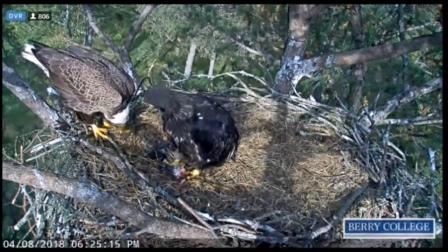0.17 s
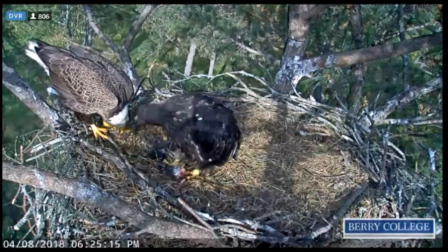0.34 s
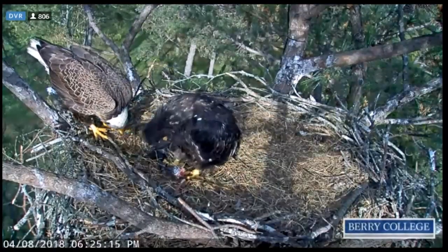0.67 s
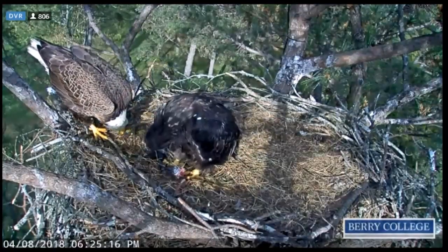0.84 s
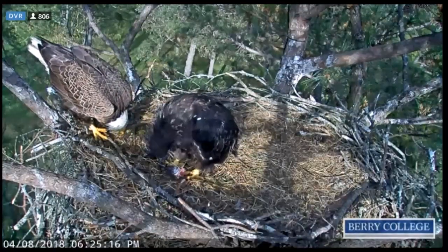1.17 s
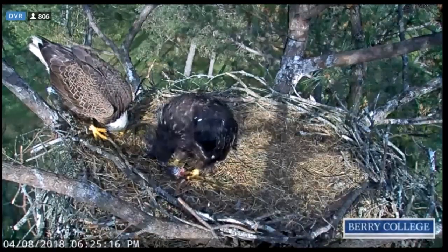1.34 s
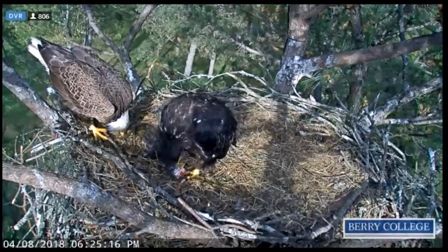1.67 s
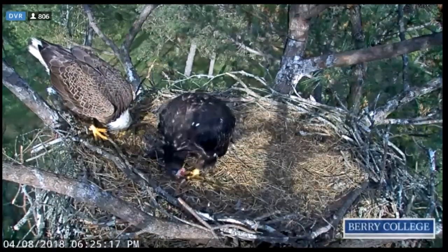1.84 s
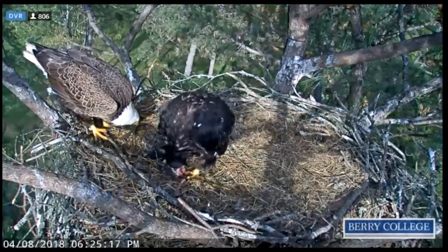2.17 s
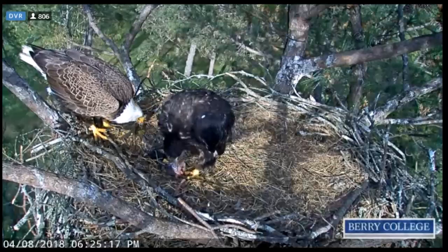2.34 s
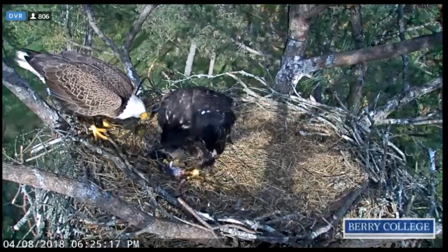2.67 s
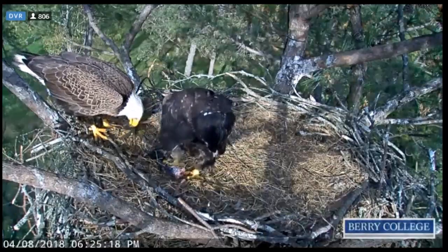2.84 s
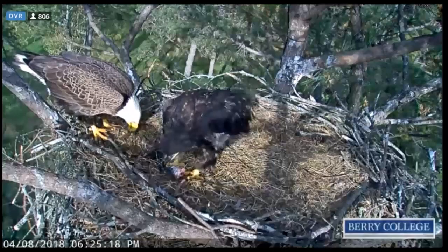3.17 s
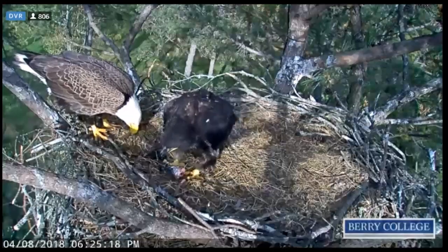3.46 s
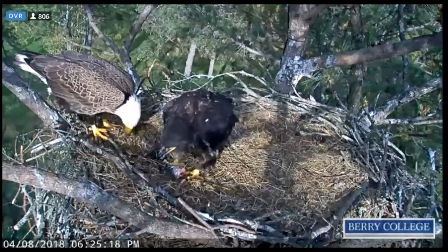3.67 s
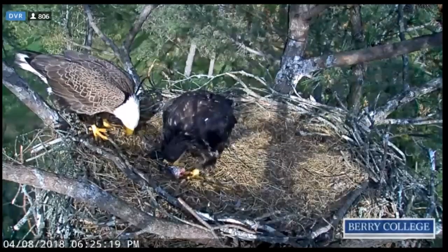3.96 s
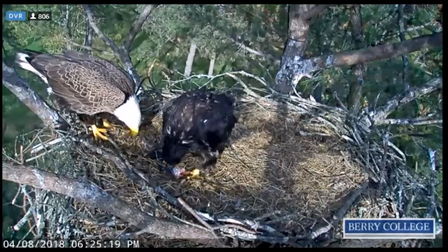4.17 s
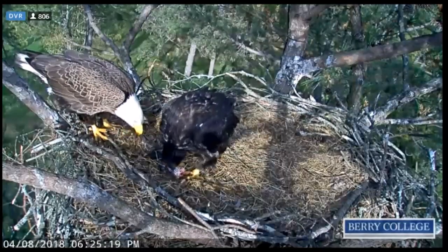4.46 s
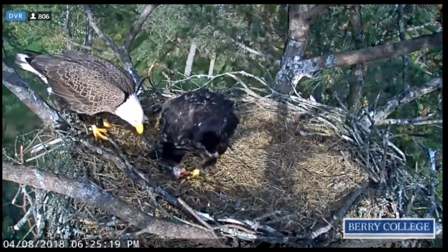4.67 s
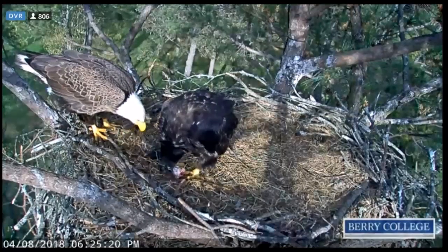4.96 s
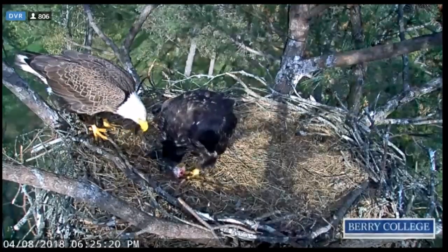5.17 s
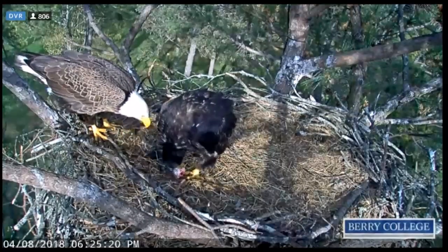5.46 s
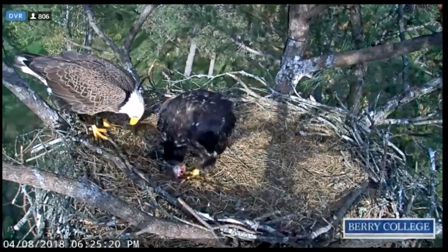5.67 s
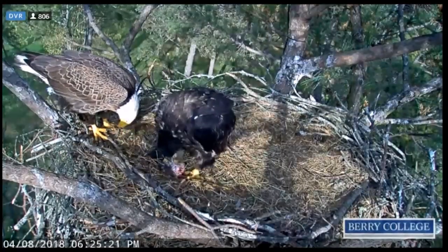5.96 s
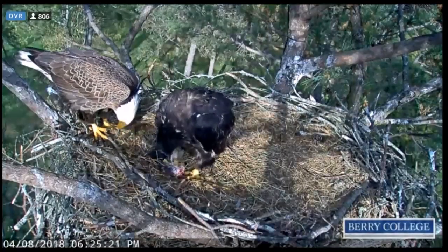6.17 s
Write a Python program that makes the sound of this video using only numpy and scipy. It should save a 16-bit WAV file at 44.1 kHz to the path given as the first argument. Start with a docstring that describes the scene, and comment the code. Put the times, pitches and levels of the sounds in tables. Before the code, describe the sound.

A treetop eagle nest outdoors, heard through a modest microphone with a coarse, faintly mirrored treble. Distant traffic makes a steady low rumble and soft tyre wash, with a weak wavering hum beneath. Wind thumps deeply on the microphone from 0 to about 2 seconds, then mostly calms. At 0.6 seconds a young eagle begins a thin, faint two-toned whistle, climbing unsteadily from about 2.8 to 4.2 kilohertz; it grows loud and raspy around 2.0 to 2.4, cracks, and drops off at 2.5. A twig snaps sharply at 2.9, and a far songbird slurs upward at 3.0. Tiny twig ticks follow. From 4.3 to 5.3 a second, quieter call quavers, buzzes hoarsely around 3.3 kilohertz, breaks upward near 5.0 and falls away. Faint songbird notes come at 5.5 and 5.7, light wind bumps return, and dry twigs crack at 6.07 and 6.27.

```python
'''At a treetop nest a young eagle begs twice: thin whistles from the two sides of its syrinx, hoarse near the top.
Each side is a tone with an octave, roughened by flutter; noise rung by throat resonances adds the rasp.
Twigs snap under the birds as short ringing noise, and a far songbird slurs a few sine whistles.
Shaped noise makes the wind on the microphone and the distant traffic; wavering sines make a low hum.
The nest camera samples at a low rate, so every whistle has a faint mirror image in the treble.'''
import sys
import numpy as np
from scipy import signal
from scipy.fft import rfft, irfft
from scipy.io import wavfile
from scipy.ndimage import uniform_filter1d

SR = 44100
rng = np.random.default_rng(int(sys.argv[2]) if len(sys.argv) > 2 else 0)


def transcribe(u):
    """Save the signal u as a 16-bit wav file named by the first command-line argument.

    u: samples, shape (n,) or (channels, n), limited to [-1, 1]; the rate is SR.
    q: integer samples, one column per channel.
    """
    v = np.clip(np.atleast_2d(u).T, -1, 1)
    q = np.round(v * 32767).astype(np.int16)
    wavfile.write(sys.argv[1], SR, q)


N = 277872
TIME = np.arange(N) / SR  # seconds
ATTACK_S, RELEASE_S = 0.0094, 0.015  # ramps of the eagle's whistles
# voice breaks, where the pitch jumps for a moment:
# (time [s], length [s], jump [Hz], level change [dB], octave level change [dB], spurt of rasp [dB])
BREAKS = [(1.331, .018, -110, 1, 0, -81), (2.314, .044, -370, -1, 20, -55), (4.912, .014, 270, 7, -10, -77),
          (5.075, .059, 380, -5, -6, -78)]


def undb(db):
    """Decibels to gain."""
    return 10 ** (np.asarray(db) / 20)


def unit(x):
    """Scale to rms 1."""
    return x / np.sqrt(np.mean(x ** 2))


def even(x, size):
    """Hold the rms near 1 over a sliding window of size samples."""
    return x / np.sqrt(uniform_filter1d(x ** 2, size))


def curves(table):
    """Each column after the time, joined by straight lines."""
    s, *columns = np.transpose(table)
    return [np.interp(TIME, s, column) for column in columns]


def gate(start, end, attack_s, release_s):
    """Attack, hold and release, the ramps centred on the start and the end."""
    opening = (TIME - start) / attack_s
    closing = (end - TIME) / release_s
    return np.clip(.5 + np.minimum(opening, closing), 0, 1)


def bump(s, half_s):
    """A smooth swell around one moment, down to 1/e at half_s either side."""
    return np.exp(-((TIME - s) / half_s) ** 2)


def wander(hz):
    """Random motion of rms 1, mostly slower than hz."""
    lowpass = signal.butter(4, hz, fs=SR, output="sos")
    settled = signal.sosfilt(lowpass, rng.standard_normal(N + SR))[SR:]  # skip the filter's start
    return unit(settled)


def coloured(points):
    """Noise of rms 1 with the given spectrum."""
    hz, db = np.transpose(points)
    f = np.arange(N // 2 + 1) * SR / N
    gain = undb(np.interp(np.log(f + 1e-9), np.log(hz), db))
    spectrum = rfft(rng.standard_normal(N)) * gain * (f > 0)
    return unit(irfft(spectrum, N))


def resonate(x, modes):
    """Parallel resonances, each applied twice for steep flanks."""
    out = 0
    for hz, width, db in modes:
        b, a = signal.iirpeak(hz, hz / width, fs=SR)
        once = signal.lfilter(b, a, x)
        out = out + undb(db) * signal.lfilter(b, a, once)
    return out


def phase_of(hz):
    """Running phase [rad] of a moving pitch."""
    return 2 * np.pi * np.cumsum(hz) / SR


def wind(wind_db=1.43, eddy_db=0.0, eddy_hz=9):
    """Eddies buffet the microphone: a changing breeze with short, stronger blows on top."""
    # breeze between the buffets, before wind_db: (time [s], level [dB])
    breeze_levels = [(0, -44), (.4, -43.5), (1.05, -48.5), (1.27, -49.5), (1.5, -42.5), (2.05, -55.5),
                     (3.6, -52.5), (3.85, -56), (5.2, -58), (5.9, -50), (6.3, -59)]
    # strongest buffets, before wind_db: (time [s], level [dB])
    buffets = [(.09, -38), (0.192, -37), (0.269, -37), (.4, -35), (0.579, -38), (.72, -47), (.84, -39),
               (.97, -48), (1.125, -34), (1.405, -34), (1.6, -43), (1.667, -32.5), (1.839, -38.5),
               (1.95, -46.5), (3.37, -44.5), (4.783, -40.5), (4.87, -44), (5.421, -42), (5.549, -42.5),
               (5.72, -44.5), (6.14, -45), (6.25, -44)]
    # spectrum at the microphone: (frequency [Hz], relative density [dB])
    wind_colour = [(8, -2), (22, -0.5), (45, -0.5), (65, -1), (90, -8), (130, -16.5), (200, -28.5),
                   (400, -78)]
    db, = curves(breeze_levels)
    breeze = undb(db + eddy_db * wander(eddy_hz))
    blows = sum(undb(level) * bump(s, half_s=0.024) for s, level in buffets)
    noise = unit(even(coloured(wind_colour), size=3400))
    return undb(wind_db) * np.hypot(breeze, blows) * noise


def distant_traffic(rumble_db=-56.5, road_db=1):
    """Far traffic: a low rumble and a soft band of tyre noise, both of shaped noise."""
    # tyre noise, before road_db: (time [s], level [dB])
    road_levels = [(0.1, -63.5), (2.44, -64.5), (3.09, -61.5), (5.89, -64.5), (6.2, -64.5)]
    # spectrum of the tyre noise: (frequency [Hz], relative density [dB])
    road_colour = [(150, -5.5), (350, -5), (500, -3), (700, 0.5), (900, 4), (1100, 0.5), (1400, -4.5),
                   (1750, -12.5), (2100, -14), (2600, -20), (3400, -33), (4200, -24.5), (5000, -36.5),
                   (7000, -30.5)]
    # spectrum of the rumble: (frequency [Hz], relative density [dB])
    rumble_colour = [(30, -11.5), (70, -12), (105, 7), (150, -0.5), (220, -4.5), (280, -14.5), (380, -22),
                     (700, -40)]
    db, = curves(road_levels)
    road = undb(db + road_db + .5 * wander(12)) * coloured(road_colour)
    rumble = undb(rumble_db + 1.0 * wander(11)) * coloured(rumble_colour)
    return road + rumble


def distant_hum():
    """Steady tones that waver slightly in level and pitch."""
    # tones, about which each wavers: (frequency [Hz], rms level [dB])
    tones = [(172.3, -67), (909.8, -86.5), (2099, -88.5)]
    out = np.zeros(N)
    for hz, db in tones:
        level = np.sqrt(2) * undb(db + 2 * wander(2.3))
        out += level * np.sin(phase_of(hz + 2.01 * wander(7)))
    return out


def twigs(rustle_db=-93, attack_s=0.00073):
    """Short cracks ring dry twigs; straw crackles faintly underfoot."""
    # twig snaps: (time [s], level [dB], decay [s])
    snap_times = [(2.903, -42.5, 0.0014), (2.905, -58, 0.001), (3.169, -66, 0.0049), (3.917, -66.5, 0.0019),
                  (4.245, -63, 0.0025), (5.118, -53, 0.00062), (5.336, -61, 0.00087), (5.824, -60, 0.0026),
                  (6.051, -69, 0.0064), (6.056, -59, 0.0038), (6.065, -63, 0.0092), (6.0724, -45.5, .0016),
                  (6.083, -69, 0.0065), (6.2656, -50, 0.0016)]
    # resonances of a dry twig: (frequency [Hz], width in one pass [Hz], relative level [dB])
    twig_modes = [(1300, 1260, -7.5), (2300, 520, -4.5), (4160, 320, -10.5), (5550, 580, -11),
                  (6600, 1130, 4.5)]
    cracks = np.zeros(N)
    for s, db, decay in snap_times:
        age = TIME - s
        cracks += undb(db) * np.exp(-abs(age) / np.where(age < 0, attack_s, decay))
    snaps = cracks * even(resonate(rng.standard_normal(N), twig_modes), size=90)
    clicks = rng.random(N) < 300 / SR  # 300 a second on average
    straw = rng.standard_normal(N) * clicks * undb(3 * wander(6))
    return snaps + undb(rustle_db) * unit(resonate(straw, twig_modes))


def contour(table):
    """Pitch, level and octave level of a call, with its voice breaks, and the gate that opens it."""
    slew_s = 0.0057
    hz, db, octave_db = curves(table)
    for s, length, jump_hz, change_db, octave_change_db, _ in BREAKS:
        broken = gate(s, s + length, slew_s, slew_s)
        hz = hz + jump_hz * broken
        db = db + change_db * broken
        octave_db = octave_db + octave_change_db * broken
    return hz, db, octave_db, gate(table[0][0], table[-1][0], ATTACK_S, RELEASE_S)


def membrane(hz, db, octave_db, sounding, rough, flutter, chaos_hz, wobble_hz,
             jitter_hz=13, swing_hz=160, stagger_hz=60):
    """One whistling membrane: sound, phase and size. Pushed hard, it flutters and its pitch scatters."""
    jitter = jitter_hz * wander(127) * undb(4.04 * wander(12.96))
    unsteady_hz = wobble_hz * wander(29) + jitter
    scatter_hz = chaos_hz * wander(600) + swing_hz * flutter + stagger_hz * wander(99)
    phase = phase_of(hz + unsteady_hz + rough * scatter_hz)
    swell = np.sqrt(2) * undb(1.1 * wander(36)) * sounding
    throb = even(np.exp(rough * (1.9 * flutter + .6 * wander(400))), size=600)
    tone = undb(db) * np.sin(phase)
    octave = undb(octave_db + 1.5 * wander(28)) * np.sin(2 * phase)
    return swell * throb * (tone + octave), phase, swell * undb(db)


def syrinx(leading, other, patchy_db, sum_db, sideband_db):
    """Two membranes whistle at once, the other unsteadily; coupling adds a sum tone and a patchy side tone."""
    first, first_phase, first_size = leading
    second, second_phase, second_size = other
    coupling = np.minimum(first_size, second_size) * undb(4 * wander(25))
    sum_tone = undb(sum_db) * np.sin(first_phase + second_phase)
    side_tone = undb(sideband_db) * np.sin(2 * second_phase - first_phase)
    return first + second * undb(patchy_db * wander(20)) + coupling * (sum_tone + side_tone)


def first_call(flutter, chaos_hz=150, wobble_hz=19, half_db=-5, half_scatter_hz=190):
    """Two whistles climb side by side to a harsh scream; gives the sound and the strength of its rasp."""
    # leading side of the syrinx: (time [s], pitch [Hz], level [dB], level of the octave [dB])
    leading_side = [(0.63, 2800, -71, -87), (.77, 2800, -64.5, -86), (1.03, 3084, -68, -83),
                    (1.11, 2980, -68, -82), (1.33, 3274, -68.5, -86), (1.54, 3600, -67, -70),
                    (1.6, 3466, -64.5, -88), (1.84, 3780, -69.5, -94), (1.92, 3910, -66.5, -88),
                    (1.99, 4010, -67.5, -72), (2.065, 4240, -57, -72), (2.135, 4030, -60.5, -49),
                    (2.21, 3970, -51, -58), (2.27, 4034, -55.5, -50), (2.295, 3995, -49.5, -68),
                    (2.37, 3884, -61, -70), (2.425, 3775, -47, -68), (2.47, 3550, -51, -69),
                    (2.499, 3130, -47, -45)]
    # hoarseness: (time [s], roughness [0-1], level of the rasping air [dB])
    hoarseness = [(1.66, 0.01, -102), (1.78, 0.08, -74.5), (1.94, 0.05, -77), (1.985, 0.22, -62),
                  (2.12, 0.22, -61), (2.21, 0.54, -65), (2.285, 0.19, -61.5), (2.41, 0.05, -83),
                  (2.5, .05, -77)]
    # other side, just above:
    # (time [s], interval [Hz], level re the leading side [dB], level of its octave [dB])
    upper_side = [(0.604, 151.4, -6, -82), (.65, 436, 4.5, -71.5), (.77, 434, -9, -68.5),
                  (0.852, 665, -9.5, -78.5), (1.31, 490, -2.5, -77), (1.351, 566, 7.5, -74),
                  (1.7, 556, 3.5, -66), (1.85, 400, 4.5, -81), (2.085, 289, 3.5, -68),
                  (2.139, 188.7, -7, -94), (2.32, 218.6, -27, -78), (2.364, 170, 11.5, -57),
                  (2.417, 318, -3, -52)]
    hz, db, octave_db, sounding = contour(leading_side)
    rough, rasp_db = curves(hoarseness)
    interval_hz, upper_db, upper_octave_db = curves(upper_side)
    upper_hz = hz + interval_hz
    joins = gate(upper_side[0][0], upper_side[-1][0], ATTACK_S, RELEASE_S)
    leading = membrane(hz, db, octave_db, sounding, rough, flutter, chaos_hz, wobble_hz)
    upper = membrane(upper_hz, db + upper_db, upper_octave_db, joins, rough, flutter, chaos_hz, wobble_hz)
    air = undb(rasp_db) * sounding
    # when hoarse, the upper side doubles its period: a blurred line half-way to its octave
    half_phase = phase_of(upper_hz * 1.5 + half_scatter_hz * wander(466))
    half_line = air * undb(half_db) * np.sin(half_phase)
    return syrinx(leading, upper, patchy_db=-2.0, sum_db=-12.5, sideband_db=-19) + half_line, air


def second_call(flutter, chaos_hz=105, wobble_hz=19, lower_octave_db=-14):
    """A quavering, then buzzing whistle over faint low notes drops away; gives sound and rasp strength."""
    # leading side of the syrinx: (time [s], pitch [Hz], level [dB], level of the octave [dB])
    leading_side = [(4.28, 3270, -82, -47), (4.3, 3150, -83, -56), (4.335, 3190, -71.5, -69),
                    (4.39, 3350, -79, -57), (4.418, 3330, -80, -62), (4.435, 3063, -57, -61.5),
                    (4.51, 3150, -62, -60), (4.55, 3396, -62.5, -55), (4.6, 3426, -64.5, -55.5),
                    (4.69, 3320, -70, -65.5), (4.77, 3320, -69, -65.5), (4.815, 3320, -65, -49.5),
                    (4.87, 3430, -63.5, -58), (5.005, 3507, -61, -51), (5.045, 3700, -55.5, -51.5),
                    (5.14, 3425, -59, -69), (5.225, 3400, -57.5, -75), (5.255, 3150, -55.5, -58.5),
                    (5.275, 2870, -68, -73)]
    # hoarseness: (time [s], roughness [0-1], level of the rasping air [dB])
    hoarseness = [(4.41, 0.093, -95), (4.45, 0.28, -73), (4.57, 0.5, -78), (4.72, 0.46, -70),
                  (4.83, 0.19, -76), (4.92, 0.2, -68.5), (5.04, 0.035, -106), (5.1, 0.3, -73),
                  (5.15, 0.05, -76), (5.27, 0.095, -93)]
    # low, faint notes of the other side: (time [s], length [s], level [dB])
    lower_notes = [(4.305, 0.13, -83), (4.42, 0.089, -83), (4.963, 0.14, -84)]
    quaver_hz, quaver_swing_hz, quaver_decay_s = 27, 108, 0.073
    hz, db, octave_db, sounding = contour(leading_side)
    rough, rasp_db = curves(hoarseness)
    age = np.maximum(TIME - leading_side[0][0], 0)
    quaver = quaver_swing_hz * np.exp(-age / quaver_decay_s) * np.cos(2 * np.pi * quaver_hz * age)
    lower_hz = 2840 + 39.9 * wander(13) + quaver
    notes = sum(undb(level) * gate(s, s + length, ATTACK_S, RELEASE_S) for s, length, level in lower_notes)
    leading = membrane(hz + quaver, db, octave_db, sounding, rough, flutter, chaos_hz, wobble_hz)
    lower = membrane(lower_hz, 0, lower_octave_db, notes, rough, flutter, chaos_hz, wobble_hz)
    air = undb(rasp_db) * sounding
    return syrinx(leading, lower, patchy_db=8.5, sum_db=-5, sideband_db=-30), air


def rasp(size, flutter, pulse_db=2, spurt_db=3.5, surge_db=1.2):
    """Turbulent air rings the throat in quick, uneven spurts, pulsing with the flutter."""
    # resonances of throat and beak: (frequency [Hz], width in one pass [Hz], relative level [dB])
    throat_modes = [(2070, 320, 10.5), (3120, 500, 9), (4170, 400, 8.5), (5590, 980, 7.5),
                    (6320, 1240, 18.5), (7070, 510, 14)]
    pulsing_db = pulse_db * flutter + spurt_db * wander(600) + surge_db * wander(32)
    air = rng.standard_normal(N) * undb(pulsing_db)
    return size * unit(resonate(air, throat_modes))


def eagle():
    """Two begging calls; air rasps through both and spurts just after each voice break begins."""
    flutter_hz, drift = 246.5, .16  # of the membranes when pushed hard; drift as a share of the rate
    spurt_s, spurt_delay_s = 0.012, 0.015
    flutter = np.sin(phase_of(flutter_hz * (1 + drift * wander(16))))
    first, first_air = first_call(.4 * flutter)
    second, second_air = second_call(.75 * flutter)
    spurts = sum(undb(db) * bump(s + spurt_delay_s, spurt_s) for s, *_, db in BREAKS)
    return first + second + rasp(first_air + second_air + spurts, flutter)


def songbird():
    """Slurred whistles from far off in the wood: sines that glide and waver in pitch."""
    # whistles: (time [s], length [s], start pitch [Hz], end pitch [Hz], peak level [dB])
    whistles = [(2.97, .17, 2440, 3120, -78), (5.52, .1, 2400, 2700, -78), (5.69, .11, 3020, 2920, -78)]
    out = np.zeros(N)
    for s, length, start_hz, end_hz, db in whistles:
        along = np.clip((TIME - s) / length, 0, 1)
        hz = start_hz + (end_hz - start_hz) * along + 35 * wander(86)
        out += undb(db) * np.sin(np.pi * along) * np.sin(phase_of(hz))
    return out


def canopy(x, wet_db=-21, t60=0.28):
    """Trunks and branches scatter a thin, short echo: decaying noise after a 6 ms gap."""
    age = TIME[:SR]
    tail = rng.standard_normal(SR) * np.exp(-np.log(1000) * age / t60) * (age > .006)
    return x + undb(wet_db) * signal.fftconvolve(x, tail / np.linalg.norm(tail))[:N]


def scene():
    """Birds and twigs among the branches, over wind at the microphone and distant traffic and hum."""
    among_branches = canopy(eagle() + twigs() + songbird())
    return (among_branches + wind() + distant_traffic() + distant_hum())[None]


def record(dry):
    """Coarse samples joined by straight lines mirror the sound about half the camera's rate."""
    camera_hz, top_hz = 16000, 15300
    band = signal.sosfilt(signal.butter(18, 7500, fs=SR, output="sos"), dry[0])
    samples = signal.resample_poly(band, camera_hz, SR, window=("kaiser", 3))
    # draw the lines at four times the output rate, then come down
    fine_time = np.arange(4 * N) / (4 * SR)
    fine = np.interp(fine_time, np.arange(len(samples)) / camera_hz, samples)
    joined = signal.resample_poly(fine, 1, 4)
    return signal.sosfilt(signal.ellip(8, .2, 70, top_hz, fs=SR, output="sos"), joined)[None]


dry = scene()
out = record(dry)
transcribe(out)
```